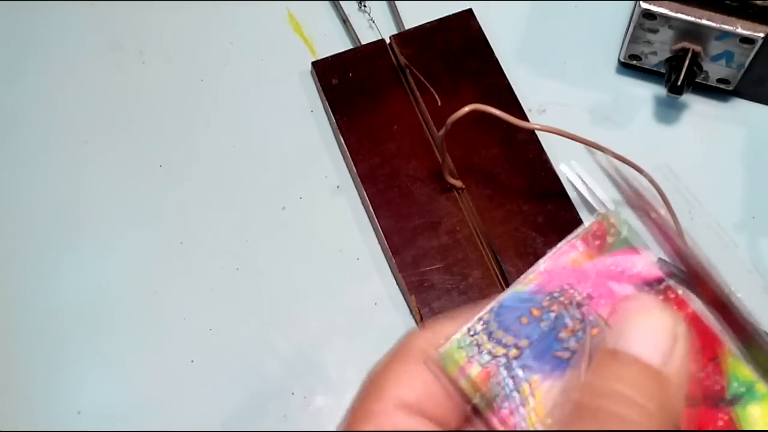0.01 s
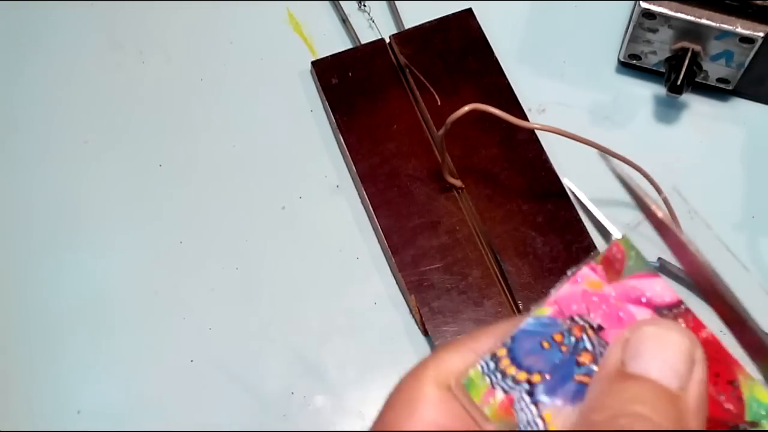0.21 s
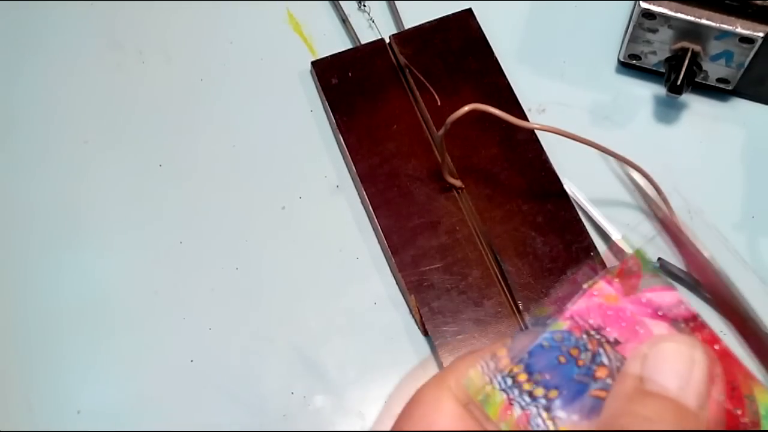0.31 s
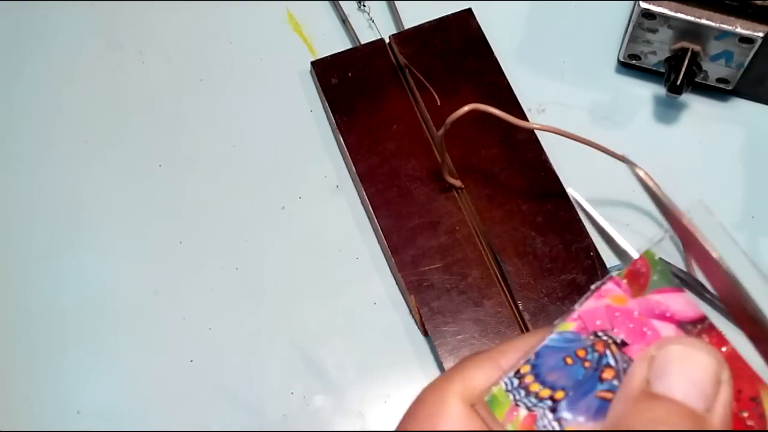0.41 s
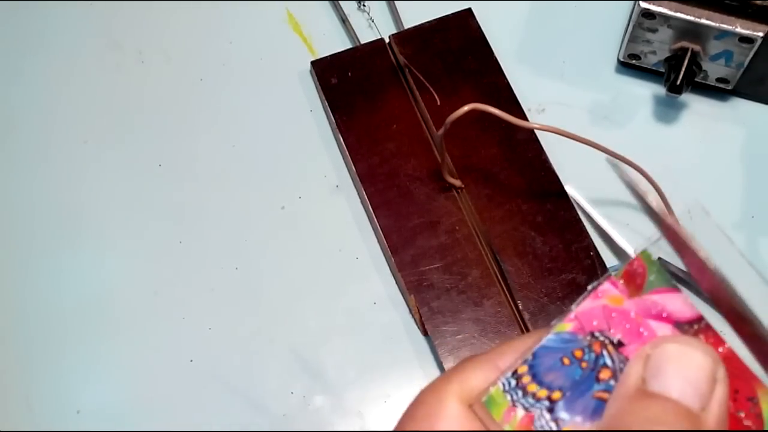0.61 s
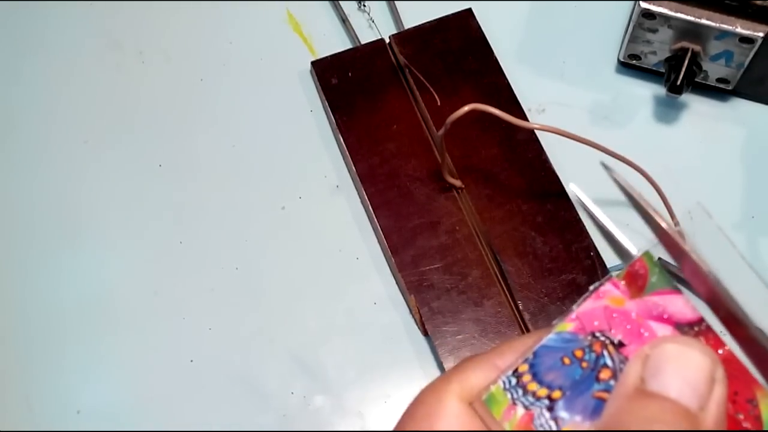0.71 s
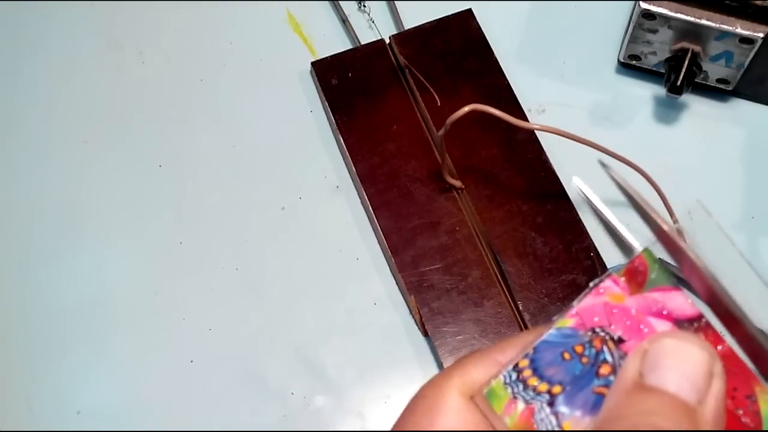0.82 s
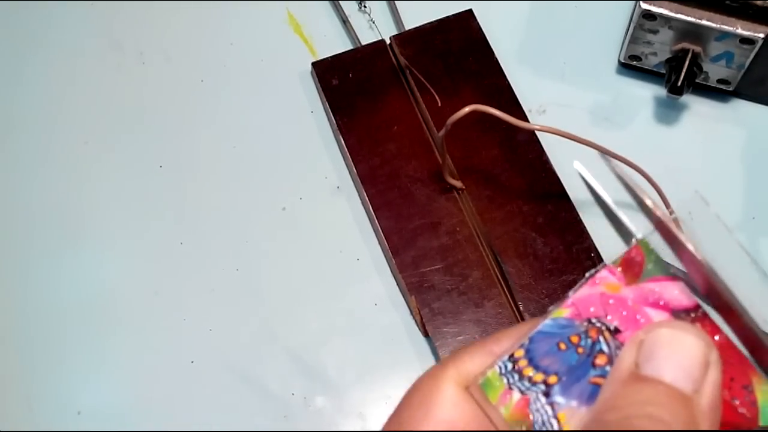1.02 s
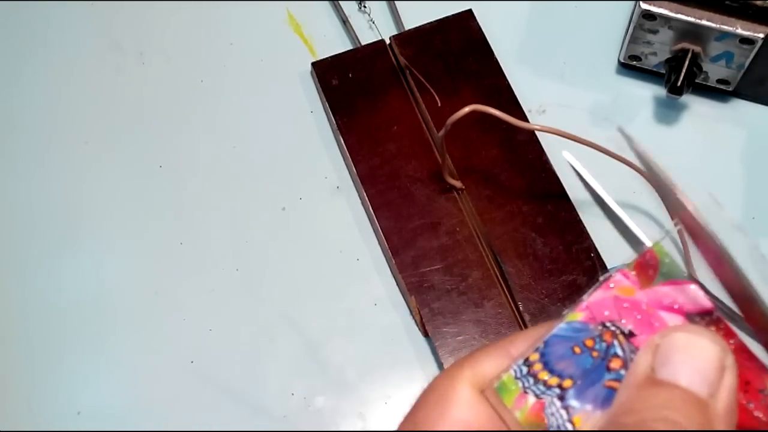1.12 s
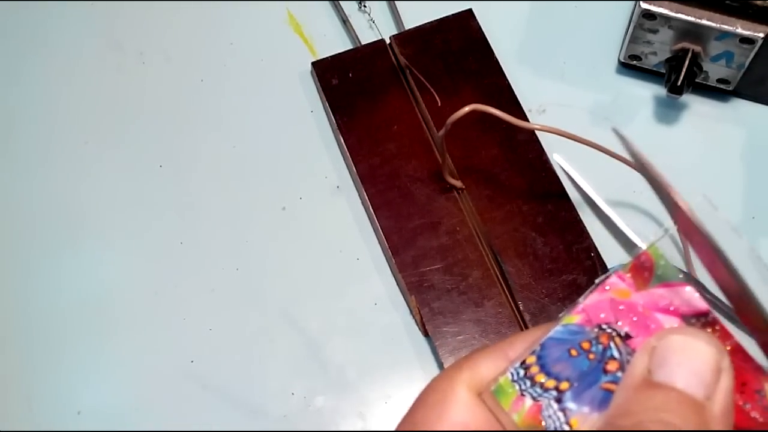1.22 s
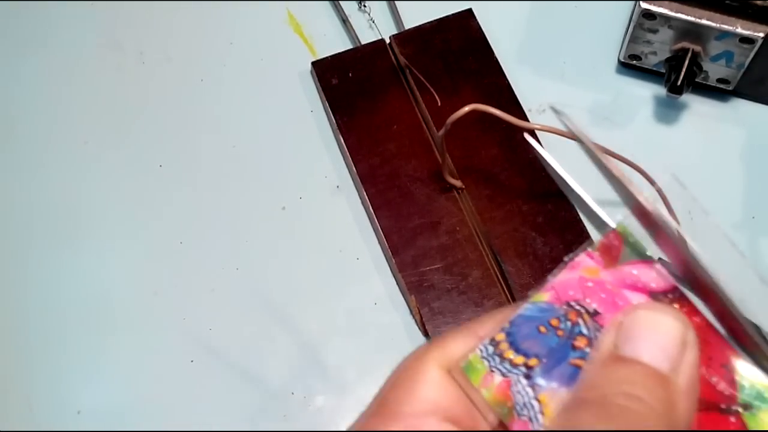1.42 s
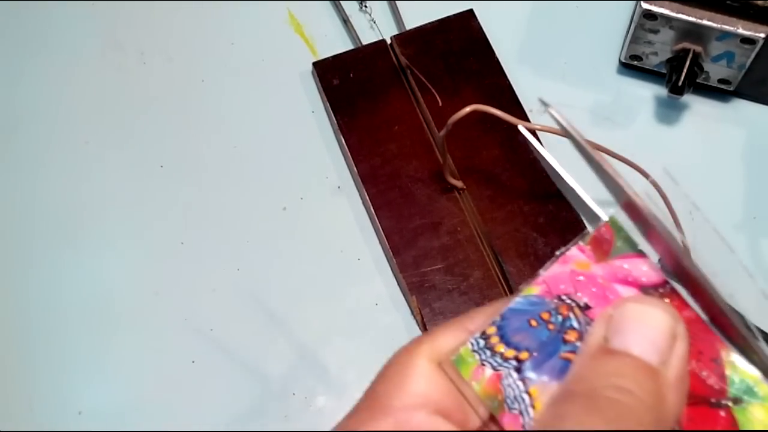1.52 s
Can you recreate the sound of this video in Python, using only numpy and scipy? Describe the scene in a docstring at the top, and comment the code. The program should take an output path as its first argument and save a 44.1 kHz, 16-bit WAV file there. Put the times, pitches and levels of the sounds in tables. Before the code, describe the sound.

Scissors snip stiff thin plastic, three sharp uneven cracks with faint ticks in a small quiet room

```python
"""Scissors cutting stiff plastic

Scissors snip a thin, stiff plastic sheet over a workbench in a small room, close to the microphone.
Each snap is a click through sheet resonances plus a noisy crack and blade ring, scattered by bench and room.
Faint snaps tick between the loud cuts; one brief blade slide is a swell of random catches.
Under it lie shaped room noise and a low, wavering hum."""
import sys
import numpy as np
from scipy import signal
from scipy.fft import rfft, irfft
from scipy.io import wavfile
from scipy.ndimage import uniform_filter1d

SR = 44100
rng = np.random.default_rng(int(sys.argv[2]) if len(sys.argv) > 2 else 0)


def wrap_up_sound(samples):
    """Save the sound to the file named by the first command line argument, as 16-bit audio."""
    columns = np.atleast_2d(samples).T
    # keep every value between -1 and 1, then stretch to whole-number steps
    tamed = np.clip(columns, -1, 1)
    steps = np.round(tamed * 32767).astype(np.int16)
    wavfile.write(sys.argv[1], SR, steps)


N = 70560

# Room noise colour: freq_hz, relative_density_db
AIR_COLOUR = [(35, -23), (60, -14), (80, -5), (105, -5.5), (140, -11.5), (220, -6), (530, -14.5),
              (800, -13.5), (1200, -18), (4500, -24), (9200, -29.5), (11500, -35), (13400, -51),
              (16000, -59.5)]
# Hum level over time: time_s, rms_db
HUM_LEVEL = [(0, -82), (.1, -67.5), (.26, -71), (.33, -81), (.57, -69), (.78, -68.5), (.88, -64.5),
             (1.12, -63), (1.25, -68), (1.6, -68.5)]
# Snaps, loud cuts to faint ticks: start_s, relative_level_db, bass_db, treble_db, lift_centre_hz, lift_db
SNAP_EVENTS = [(0.0108, -33.5, 19.5, -14.5, 4200, 11.5), (0.0487, -41.5, 6, -9, 4300, 6),
               (0.1972, -26, 16, -8, 3680, -10), (0.2013, -8, -2.5, 6.5, 3930, 8),
               (0.2112, -7.5, 9, -2.5, 3820, 7.5), (0.2117, -10, 2, -5, 3800, 5),
               (0.26, -38.5, -14.5, -12, 3700, 9), (0.319, -27, 6, 10.5, 4720, 6.5),
               (0.3370, -38.5, -6, -6, 5000, 8), (0.3915, 1.52, -0.5, 1.5, 4300, 1.5),
               (0.658, -42, -14, 6, 4600, 3), (0.6863, -40.5, -13, -6, 4300, 20),
               (0.7273, -31, -22, 3, 4520, 13), (1.3117, -30, 9, 11, 4380, -1),
               (1.3207, -3, 3, -0.5, 4900, 2), (1.3217, -11, 5.5, 1, 5300, 12),
               (1.3972, -40, 17, 10, 4600, -1), (1.5252, -30.5, -14, 8.5, 5230, 5)]
# Broad resonances of the sheet held between the blades: centre_hz, width_hz, relative_level_db
SHEET_MODES = [(527, 262, -29.5), (901, 255, -18.5), (1665, 394, -12.5), (1978, 305, -7.5),
               (2605, 500, -7.5), (3263, 283, 2), (3685, 370, -1.5), (4504, 770, 2.5), (4780, 280, -1.5),
               (5500, 590, -5.5), (6440, 1100, -15), (7230, 220, -17), (8660, 970, -19.5)]
# Thin ring of the steel blades: pitch_hz, relative_level_db, t60_s
BLADE_MODES = [(1992, -23, .09), (3194, 1, 0.033), (3670, -10, 0.063), (3760, -9, .12), (3840, 0.5, 0.097),
               (4370, -24, .1), (4300, -7.5, .11), (4772, -8.5, 0.12), (4700, -10, .12), (5393, -13.5, .11),
               (7230, -9.5, .06)]
# Colour of the running fracture: freq_hz, relative_gain_db
CRACK_COLOUR = [(150, -35), (550, -4), (1200, -12.5), (4000, 3.5), (7000, 8.5), (10500, -1), (13000, -17.5),
                (16000, -20.5)]
# Colour of blade rubbing on blade: freq_hz, relative_density_db
SLIDE_COLOUR = [(530, -13.5), (900, -9.5), (1340, -20), (1920, -6), (2410, -7), (4290, -1.5), (5680, -8.5),
                (7450, -24), (10300, -29), (12000, -47), (15600, -74), (22000, -120)]
# Swell of the blade slide: time_s, rms_db
SLIDE_SWELL = [(1.06, -82), (1.085, -67), (1.1, -54.5), (1.115, -53.5), (1.128, -56), (1.16, -59.5),
               (1.174, -65), (1.21, -77)]

AIR_RMS_DB = -64.5
HUM_HZ, HUM_WAVER_RATIO = 55, 0.0067
SNAP_DB, BLADE_DB = 3, -30
BASS_HZ, TREBLE_HZ, LIFT_OCTAVES = 2260, 6400, 0.19
CRACK_DB, CRACK_T60_S = -13, 0.017
BENCH_DB, BENCH_T60_S, BENCH_GAP_S = -1, 0.024, 0.0005  # early scatter off bench and hands
ROOM_DB, ROOM_T60_S, ROOM_GAP_S, ROOM_DAMP_HZ = -9, 0.084, 0.006, 14000
LATE_DB, LATE_T60_S = -22.5, 0.22
SLIDE_CATCHES_PER_S, SLIDE_SPREAD_DB = 1300, 3.5
TOP_HZ = 15700
RING_SAMPLES = 8192


def undb(db):
    """Decibels to gain."""
    return 10 ** (np.asarray(db) / 20)


def unit(x):
    """Scale to unit energy."""
    return x / np.sqrt(np.sum(x ** 2) + 1e-18)


def add(out, x, start_s):
    """Mix x into out from start_s."""
    i = max(int(start_s * SR), 0)
    out[i:i + len(x)] += x[:max(N - i, 0)]


def frequencies_hz(samples):
    """FFT bin frequencies, raised 1 Hz to keep logs and ratios finite."""
    return np.fft.rfftfreq(samples, 1 / SR) + 1


def curve_gain(f_hz, points):
    """Gain from (Hz, dB) points, interpolated over log frequency."""
    hz, db = np.array(points).T
    return undb(np.interp(np.log(f_hz), np.log(hz), db))


def colour(x, points):
    """Filter by (Hz, dB) points; rms 1."""
    y = irfft(rfft(x) * curve_gain(frequencies_hz(N), points), N)
    return y / np.std(y)


def strike(gain):
    """Minimum-phase click with this gain per frequency, by folding the cepstrum."""
    cepstrum = irfft(np.log(gain + 1e-6))
    cepstrum[1:RING_SAMPLES // 2] *= 2
    cepstrum[RING_SAMPLES // 2 + 1:] = 0
    return irfft(np.exp(rfft(cepstrum)))


def fade(t, t60_s):
    """Exponential decay, 60 dB in t60_s."""
    return np.exp(-np.log(1000) * t / t60_s)


def scatter(gap_s, t60_s):
    """Dense decaying reflections after a gap, spectrum evened to add little colour."""
    t = np.arange(RING_SAMPLES) / SR
    x = rng.standard_normal(RING_SAMPLES) * fade(t, t60_s) * (t >= gap_s)
    for _ in range(3):
        spectrum = rfft(x)
        local_power = uniform_filter1d(abs(spectrum) ** 2, size=48)
        x = irfft(spectrum / np.sqrt(local_power + 1e-12))
        x = x * (t >= gap_s) * (t < gap_s + 2 * t60_s)
    return unit(x)


def room_noise():
    """Faint steady noise, shaped by frequency."""
    return undb(AIR_RMS_DB) * colour(rng.standard_normal(N), AIR_COLOUR)


def hum():
    """Low sine whose pitch wavers at random and whose level drifts."""
    t = np.arange(N) / SR
    waver = np.interp(t, np.linspace(0, t[-1], num=16), rng.standard_normal(size=16))
    phase = 2 * np.pi * np.cumsum(HUM_HZ * (1 + HUM_WAVER_RATIO * waver)) / SR
    level = undb(np.interp(t, *np.array(HUM_LEVEL).T))
    return np.sqrt(2) * np.sin(phase) * level


def sheet_spectrum():
    """Held sheet: broad resonances, summed in power, struck by a click."""
    f = frequencies_hz(RING_SAMPLES)
    power = 0
    for hz, width_hz, db in SHEET_MODES:
        detune = (f / hz - hz / f) * hz / width_hz
        power = power + undb(db) ** 2 / (1 + detune ** 2) ** 2
    return rfft(unit(strike(np.sqrt(power))))


def room_spectrum():
    """Small room: a short and a longer decay, treble damped."""
    short = undb(ROOM_DB) * scatter(ROOM_GAP_S, ROOM_T60_S)
    late = undb(LATE_DB) * scatter(ROOM_GAP_S, LATE_T60_S)
    return rfft(short + late) / (1 + 1j * frequencies_hz(RING_SAMPLES) / ROOM_DAMP_HZ)


def crack_spectrum():
    """Fracture running on through the plastic: a coloured burst of dense scatter."""
    click = unit(strike(curve_gain(frequencies_hz(RING_SAMPLES), CRACK_COLOUR)))
    return rfft(click) * rfft(scatter(0, CRACK_T60_S))


def blade_ring(f, tone_db, lift_db):
    """Steel blades: decaying sines that follow the snap's tone, less half its lift."""
    t = np.arange(RING_SAMPLES) / SR
    ring = np.zeros(RING_SAMPLES)
    for hz, db, t60_s in BLADE_MODES:
        gain = undb(db + np.interp(hz, f, tone_db) - lift_db / 2)
        phase = rng.uniform(0, 2 * np.pi)
        ring += gain * fade(t, t60_s) * np.sin(2 * np.pi * hz * t + phase)
    return ring / np.sqrt(len(BLADE_MODES))


def snap(sheet, room, bass_db, treble_db, centre_hz, lift_db):
    """Sheet gives way: resonant click and crack through bench and room, plus direct blade ring."""
    f = frequencies_hz(RING_SAMPLES)
    bass = bass_db / (1 + (f / BASS_HZ) ** 4)
    treble = treble_db / (1 + (TREBLE_HZ / f) ** 6)
    lift = lift_db * np.exp(-(np.log2(f / centre_hz) / LIFT_OCTAVES) ** 2)
    tone_db = bass + treble + lift
    body = sheet + undb(CRACK_DB) * crack_spectrum()
    click = unit(irfft(body * rfft(strike(undb(tone_db)))))
    bench = undb(BENCH_DB) * rfft(scatter(BENCH_GAP_S, BENCH_T60_S))
    spaced = unit(irfft(rfft(click) * (1 + bench + room)))
    return spaced + undb(BLADE_DB) * blade_ring(f, tone_db, lift_db)


def cuts():
    """Every snap at its moment, all from the same sheet in the same room."""
    sheet, room = sheet_spectrum(), room_spectrum()
    out = np.zeros(N)
    for start_s, level_db, *tone in SNAP_EVENTS:
        add(out, undb(SNAP_DB + level_db) * snap(sheet, room, *tone), start_s)
    return out


def slide():
    """Blade rubs on blade: random tiny catches, scattered, coloured and swelled."""
    t = np.arange(N) / SR
    hits = rng.random(N) < SLIDE_CATCHES_PER_S / SR
    sizes = undb(SLIDE_SPREAD_DB * rng.standard_normal(N))
    catches = hits * sizes * rng.choice([-1, 1], N)
    rub = signal.fftconvolve(catches, scatter(0, BENCH_T60_S))[:N]
    time_s, rms_db = np.array(SLIDE_SWELL).T
    level = np.interp(t, time_s, undb(rms_db), left=0, right=0)
    return level * colour(rub, SLIDE_COLOUR)


def scene():
    """Room noise, hum, cuts and blade slide, in mono."""
    return (room_noise() + hum() + cuts() + slide())[None]


def record(dry):
    """The recorder cuts the top: steep elliptic low-pass."""
    low_pass = signal.ellip(8, 0.2, 70, TOP_HZ, fs=SR, output="sos")
    return signal.sosfilt(low_pass, dry)


dry = scene()
out = record(dry)
wrap_up_sound(out)
```